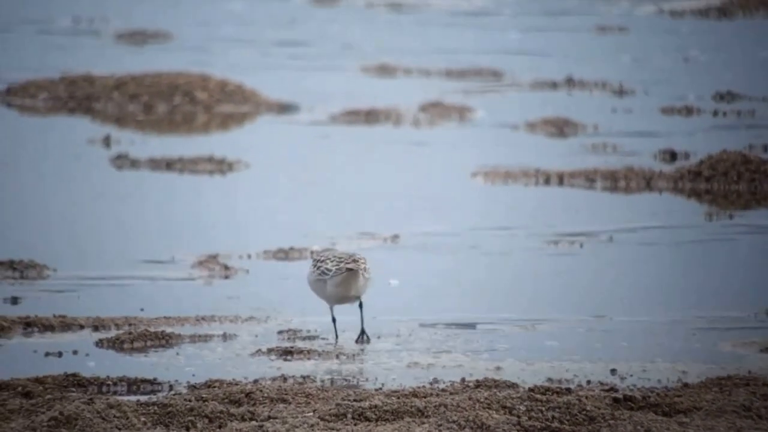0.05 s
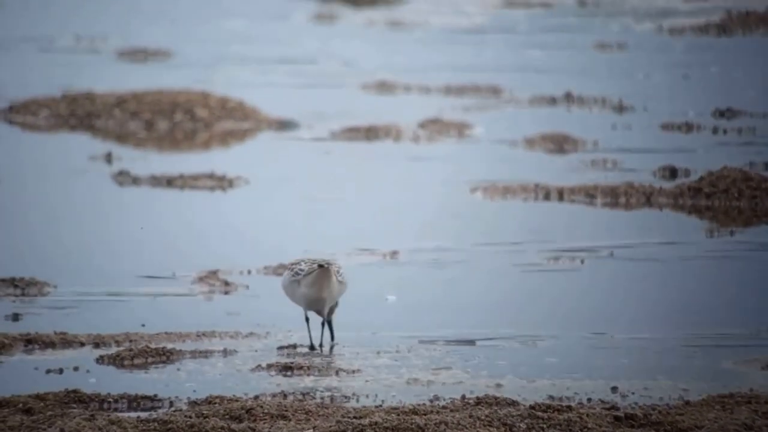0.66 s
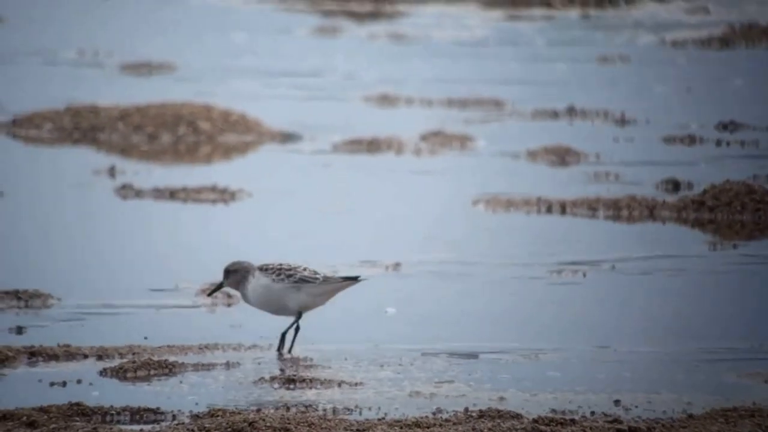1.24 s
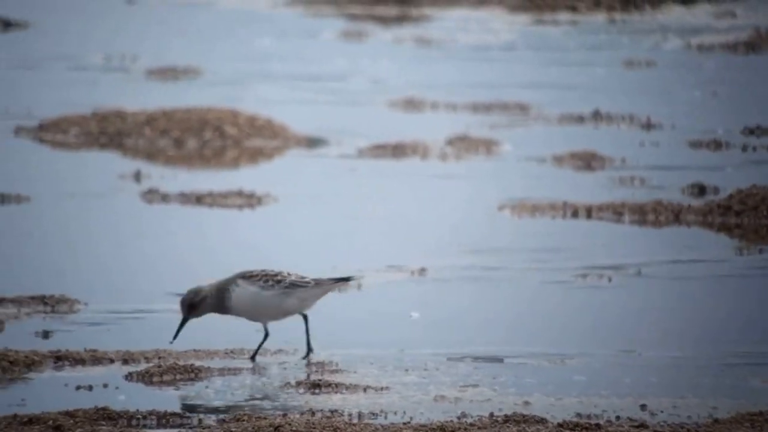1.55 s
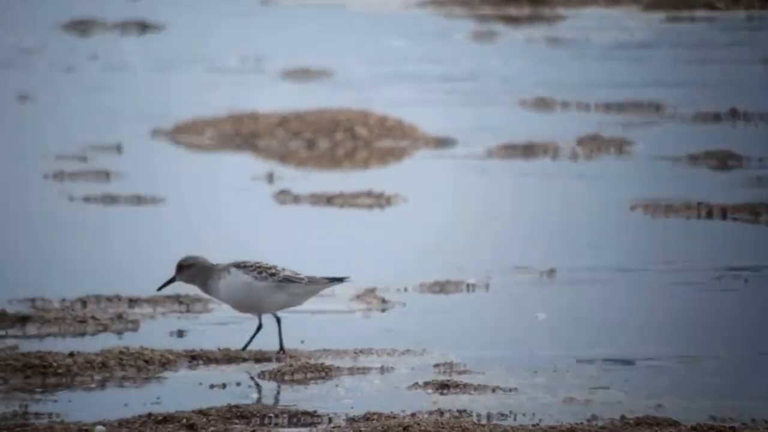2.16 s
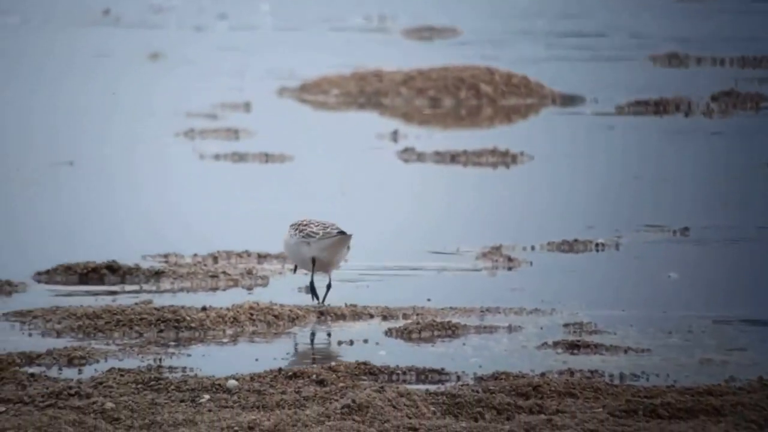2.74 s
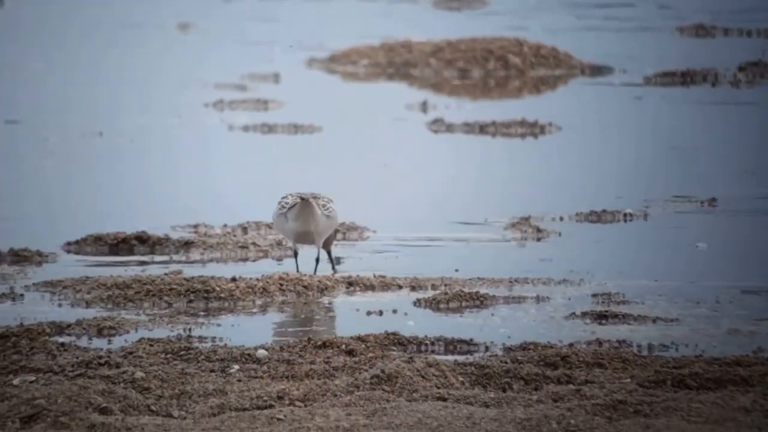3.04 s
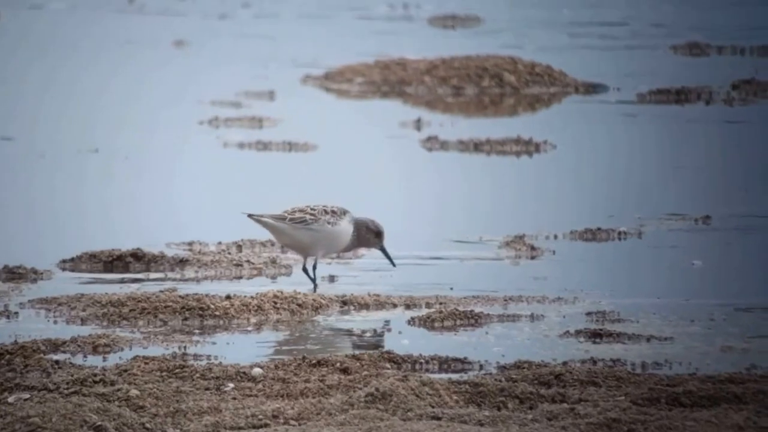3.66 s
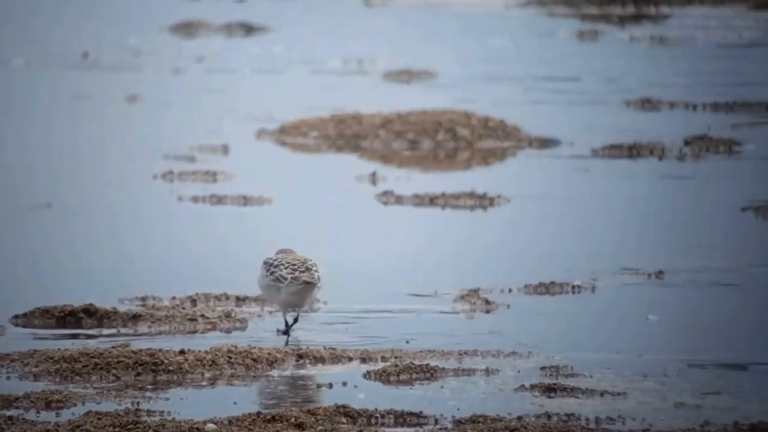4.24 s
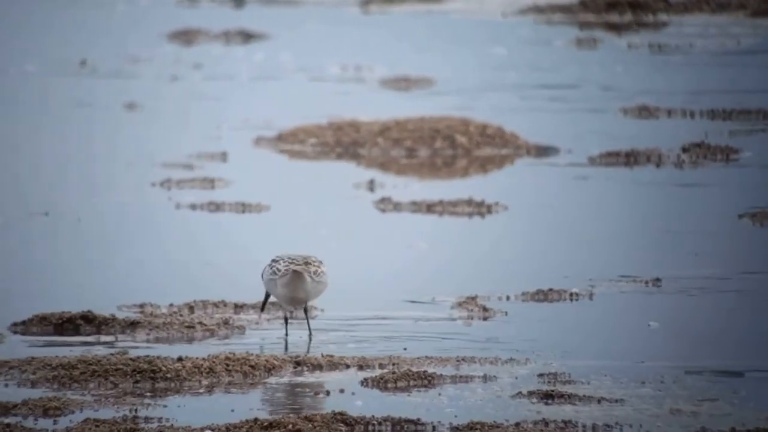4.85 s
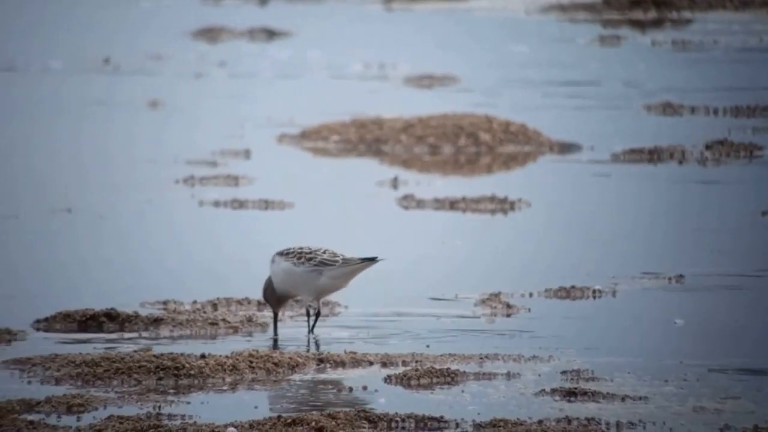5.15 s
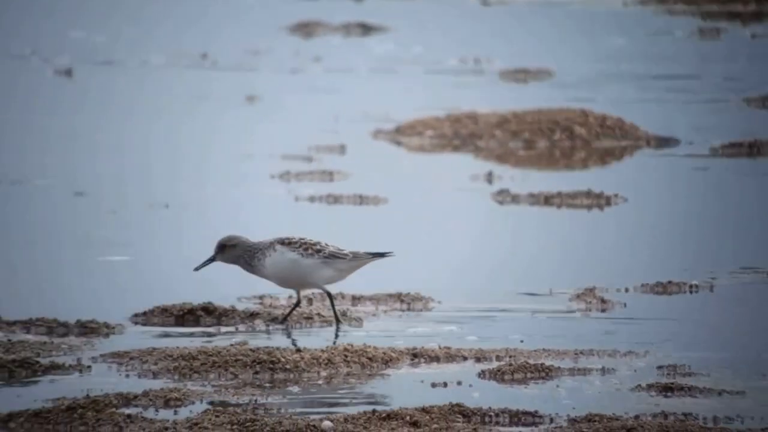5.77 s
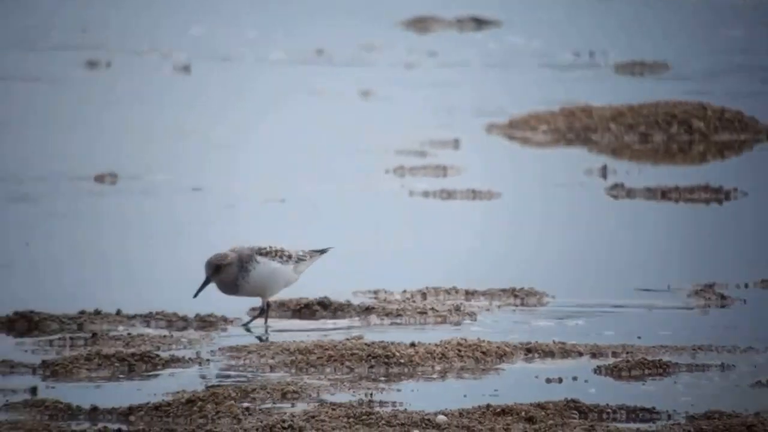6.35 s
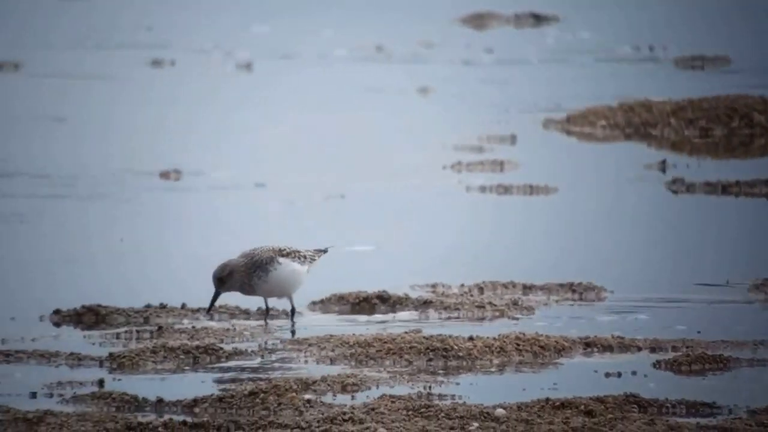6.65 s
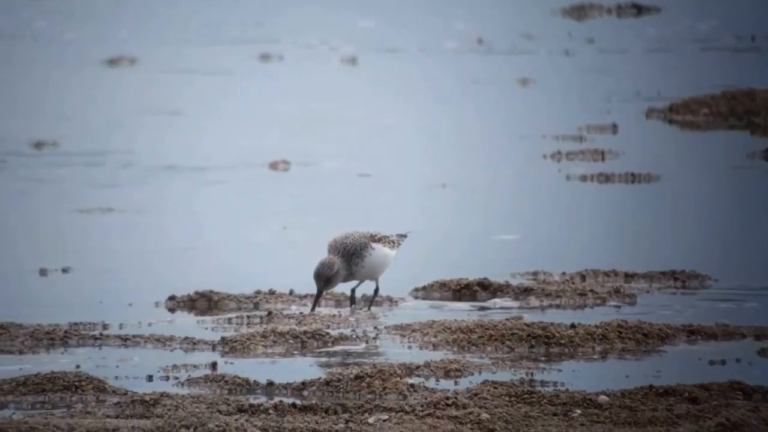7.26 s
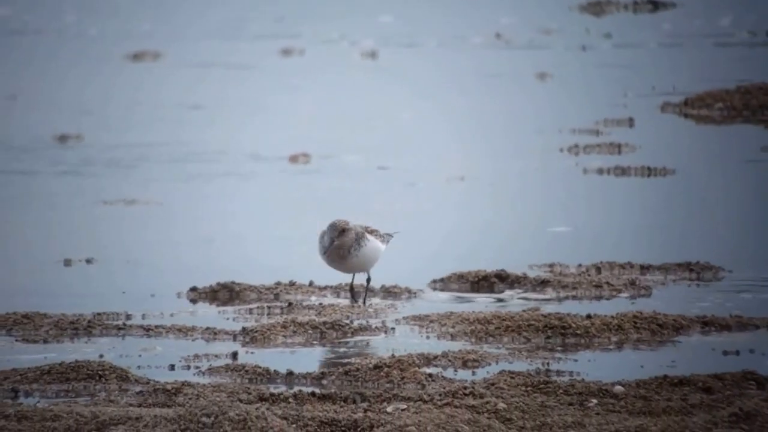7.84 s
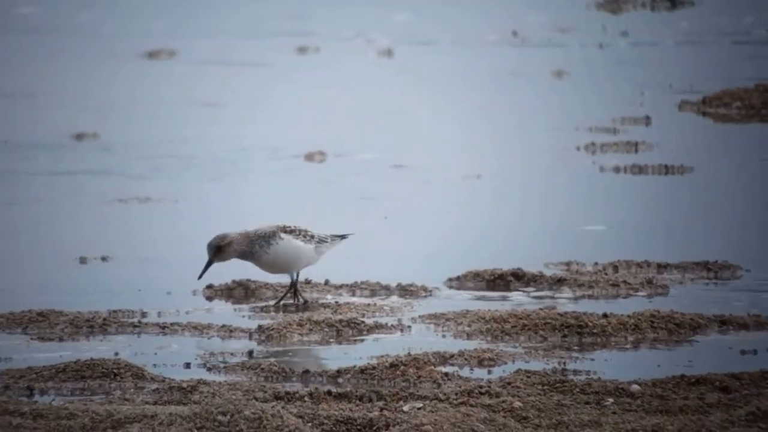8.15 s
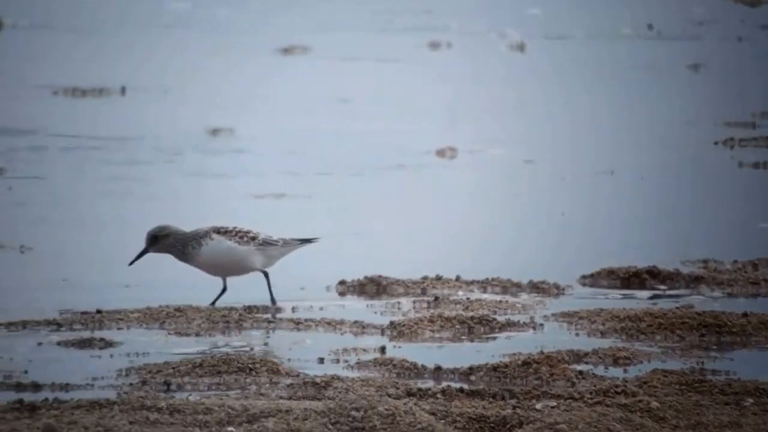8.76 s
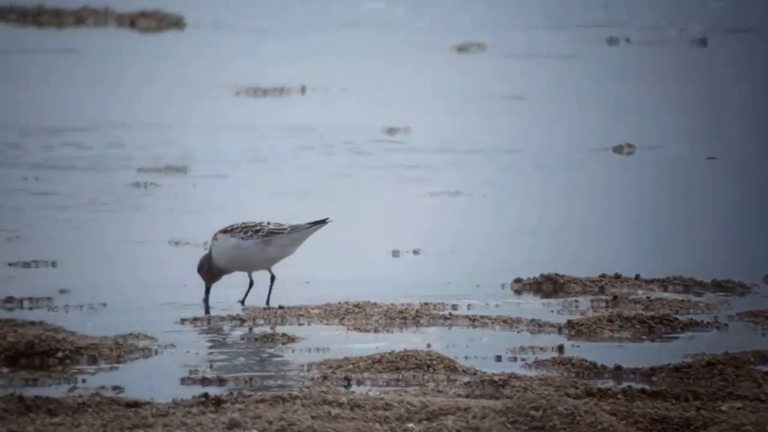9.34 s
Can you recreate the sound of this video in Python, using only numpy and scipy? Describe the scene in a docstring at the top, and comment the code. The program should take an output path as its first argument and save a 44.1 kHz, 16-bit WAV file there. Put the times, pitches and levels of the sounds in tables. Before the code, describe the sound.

Wind rumbles on the microphone in short, uneven gusts over an open tidal flat and is the loudest sound. It thumps lightly in the first two seconds, buffets hardest from 2.7 to 3.8 seconds, and returns around 5.3, 6.3 and 7.9 seconds. Small shorebirds call faintly with a slight echo. Sharp, high chips come irregularly, about once or twice a second, from 0.8 to 9 seconds. Plaintive rising whistles sound near 2.8, 5, 6.1, 7.5 and 8.9 seconds. Raspy twitters appear around 3.6 and 5.3 seconds, with a very thin, high falling call near 4 seconds and tiny pips between 4.7 and 6. Two small dry ticks come at about 0.2 seconds and another at 8.5. A soft hiss swells and fades around 1.5 seconds. Underneath lie a quiet hush, more distant birds, faint water, a low drone and a barely audible high whine.

```python
"""Shorebirds on a windy tidal flat

Small birds call with their voice box: sharp rising chips, sad whistles and a raspy twitter, each a
sliding tone smeared by echoes from the shore. Gusts of swirling air rumble and thump on the microphone.
Behind them are a few close ticks, distant water, a soft hiss, a faint low drone and a thin high whine."""
import sys
import numpy as np
from scipy import signal
from scipy.fft import rfft, irfft
from scipy.io import wavfile
from scipy.ndimage import uniform_filter1d, map_coordinates

SR = 44100
rng = np.random.default_rng(int(sys.argv[2]) if len(sys.argv) > 2 else 0)


def to_wav(s):
    """Save 16-bit WAV."""
    ch = np.atleast_2d(s).T  # columns
    pcm = np.round(np.clip(ch, -1, 1) * 32767)  # PCM
    wavfile.write(sys.argv[1], SR, pcm.astype(np.int16))


N = 414540
TIME = np.arange(N) / SR


# one chip rises, flicks up and snaps down: (time from the flick [s], pitch [ratio], level [dB])
CHIP_SHAPE = [(-.05, .92, -28), (-.035, .96, -11), (-.025, .998, -2.5), (-.015, 1.03, -.8),
              (-.005, 1.058, -1.5), (-.001, 1.23, -3.5), (.001, 1.24, -4), (.003, .84, -9), (.006, .8, -30)]
# the chips: (time of the flick [s], pitch [Hz], level [dB])
CHIP_NOTES = [(0.802, 3900, -57.5), (1.577, 3990, -58.5), (1.936, 3920, -59.5), (2.939, 3970, -57),
              (3.127, 3760, -63.5), (3.968, 4110, -53.5), (4.108, 3890, -56), (4.737, 3950, -54.5),
              (5.48, 3970, -57), (6.0, 3980, -55), (6.713, 3950, -66), (7.346, 3910, -62),
              (8.194, 4060, -61.5), (8.982, 4000, -58)]
def chips(waver=0.011, overtone_db=-25, pace_spread=0.087):
    """The bird's voice box makes the same move for every chip, each at its own pitch and pace."""
    out = np.zeros(N)
    for when, hz, db in CHIP_NOTES:
        stretch = np.exp(pace_spread * rng.standard_normal())
        t = np.arange(CHIP_SHAPE[0][0] * stretch, CHIP_SHAPE[-1][0] * stretch, 1 / SR)
        ratio, shape_db = curve(CHIP_SHAPE, t / stretch)
        pitch = hz * ratio * (1 + waver * walk(328, t - t[0]))
        voice = tone(pitch) + undb(overtone_db) * tone(2 * pitch)
        add(out, when + t[0], undb(db + shape_db) * voice)
    return out


# one whistle starts softly, rises and levels off: (how far along [0-1], pitch [ratio], level [dB])
WHISTLE_SHAPE = [(0, .91, -24), (.2, .93, -11), (.39, .945, -12), (.46, .96, -1), (.8, .99, 0),
                 (.93, 1, -4), (1, 1, -22)]
# the whistles: (start [s], length [s], top pitch [Hz], level [dB])
WHISTLE_NOTES = [(2.846, .125, 3700, -58.5), (4.992, 0.16, 3670, -55.5), (6.099, 0.14, 3740, -51),
                 (6.133, 0.14, 3100, -61), (6.45, .11, 3180, -66), (7.513, 0.13, 3630, -49),
                 (8.878, .125, 3634, -52)]
def whistles(waver=0.01, flutter_db=2.6):
    """Sad, nearly pure bird notes that share one rising shape."""
    out = np.zeros(N)
    for start, length, hz, db in WHISTLE_NOTES:
        t = np.arange(0, length, 1 / SR)
        ratio, shape_db = curve(WHISTLE_SHAPE, t / length)
        pitch = hz * ratio * (1 + waver * walk(318, t))
        add(out, start, tone(pitch) * undb(db + shape_db + flutter_db * walk(55, t)))
    return out


# the raspy twitter: (start [s], length [s], first pitch [Hz], last pitch [Hz], level [dB])
RASP_NOTES = [(3.463, 0.11, 5800, 5970, -69), (3.64, 0.078, 5650, 6380, -58),
              (3.74, 0.11, 5900, 5760, -56.5), (4.437, 0.03, 4000, 3930, -66),
              (5.227, 0.029, 4590, 4970, -61), (5.273, 0.043, 5250, 4920, -62),
              (5.3, 0.067, 4350, 4330, -69), (5.36, 0.04, 5370, 4780, -59), (5.387, 0.033, 4440, 4150, -65),
              (5.434, 0.024, 5780, 4680, -60.5), (5.5, 0.08, 4270, 3630, -63.5)]
def rasps(trill_hz=170, depth=0.074, rough=0.049):
    """Bird notes that buzz because their pitch shakes quickly and unevenly."""
    out = np.zeros(N)
    for start, length, first_hz, last_hz, db in RASP_NOTES:
        t = np.arange(0, length, 1 / SR)
        shake = depth * np.sin(2 * np.pi * trill_hz * t) + rough * walk(906, t)
        pitch = np.interp(t, [0, length], [first_hz, last_hz]) * (1 + shake)
        add(out, start, tone(pitch) * swell(t / length, crest=0.34) * undb(db))
    return out


# the path of one very high call: (time [s], pitch [Hz], level [dB])
THIN_CALL_PATH = [(3.88, 8480, -74), (3.96, 8600, -67), (4.04, 8560, -78), (4.11, 8280, -66),
                  (4.19, 7900, -71), (4.28, 7480, -74), (4.36, 7520, -67)]
def thin_call(waver=.007):
    """A thin, slightly shaky call that swells and fades as it slides down."""
    out = np.zeros(N)
    t = np.arange(THIN_CALL_PATH[0][0], THIN_CALL_PATH[-1][0], 1 / SR)
    hz, db = curve(THIN_CALL_PATH, t)
    pitch = hz * (1 + waver * walk(300, t))
    add(out, t[0], tone(pitch) * undb(db))
    return out


# short falling pips: (start [s], first pitch [Hz], level [dB])
PIP_NOTES = [(4.665, 3290, -65), (4.78, 3200, -67), (5.14, 3200, -67), (5.545, 3680, -66),
             (5.615, 3340, -63.5), (5.688, 3250, -67), (5.762, 3060, -70), (6.066, 2600, -63)]
def pips(length_s=0.0234, fall=0.248):
    """Every pip drops by the same share of its pitch in the same short time."""
    notes = [(start, length_s, hz, hz * (1 - fall), db) for start, hz, db in PIP_NOTES]
    return glides(notes, waver=0.04)


# distant calls: (start [s], length [s], first pitch [Hz], last pitch [Hz], level [dB])
FAR_NOTES = [(1.24, 0.063, 3720, 3280, -69.5), (1.92, 0.061, 3020, 2970, -70),
             (1.98, 0.057, 2900, 2450, -73), (4.45, 0.11, 4070, 4310, -61.5),
             (4.51, 0.069, 3170, 2840, -64), (5.28, 0.195, 4210, 4110, -63), (6.31, .17, 3580, 3600, -66.5),
             (6.76, 0.065, 2400, 2330, -71), (7.13, 0.23, 2140, 2100, -80), (7.75, 0.084, 970, 930, -74),
             (8.9, 0.18, 1530, 1476, -77), (8.98, 0.24, 775, 730, -72.5), (9.27, .1, 2390, 2420, -74)]
def far_calls():
    """Birds far across the flat sing faint sliding notes."""
    return glides(FAR_NOTES, waver=.015)


def glides(notes, waver, flutter_db=3.0, bend=0.41):
    """Wavering notes whose pitch slides quickly at first, then more slowly."""
    out = np.zeros(N)
    for start, length, first_hz, last_hz, db in notes:
        t = np.arange(0, length, 1 / SR)
        progress = t / length
        slide = progress + bend * progress * (1 - progress)
        pitch = (first_hz + (last_hz - first_hz) * slide) * (1 + waver * walk(320, t))
        loudness = swell(progress, crest=0.39) * undb(db + flutter_db * walk(52, t))
        add(out, start, tone(pitch) * loudness)
    return out


def shore_echoes(calls, echo_db, near_s, far_s, far_db, bank_db, bank_s=0.013):
    """A nearby bank sends back one echo, rocks and weed a quick blur, the far shore a faint long one."""
    t = np.arange(SR // 2) / SR
    near = undb(-60 * t / near_s)  # near_s and far_s: time to fade by 60 dB
    far = undb(far_db - 60 * t / far_s)
    tail = rng.standard_normal(len(t)) * (near + far) * np.minimum(t / bank_s, 1)
    tail /= np.linalg.norm(tail)
    tail[int(bank_s * SR)] += undb(bank_db)
    return calls + undb(echo_db) * signal.fftconvolve(calls, tail)[:N]


# gusts on the microphone: (start [s], length [s], level [dB])
WIND_GUSTS = [(.04, 0.18, -38.5), (0.511, .05, -48), (0.777, 0.13, -40), (1.561, 0.21, -41.5),
              (2.155, 0.37, -51.5), (2.432, 0.024, -38), (2.556, .14, -37.5), (2.7, 0.1, -27.5),
              (2.83, .2, -34), (3.205, 0.12, -36.5), (3.448, 0.1, -32.5), (3.595, 0.032, -29.5),
              (3.687, 0.099, -32.5), (3.901, 0.27, -36.5), (4.262, 0.039, -28), (4.686, 0.048, -36),
              (5.035, 0.026, -38.5), (5.222, 0.11, -28.5), (6.01, .33, -41.5), (6.4, 0.24, -53.5),
              (7.065, 0.096, -40), (7.492, 0.016, -44.5), (7.882, 0.085, -38), (8.023, 0.025, -37.5),
              (8.105, 0.094, -42), (8.361, 0.057, -38.5), (8.8, 0.72, -56.5)]
def gusts(rise_s=0.031, fade_s=0.026, breeze_db=-61.5, buffet_per_s=25, buffet_db=2.5):
    """How hard the wind blows: each gust builds, holds unevenly and dies away over a light breeze."""
    power = np.full(N, undb(breeze_db) ** 2)
    t = np.arange(SR) / SR - rise_s
    for start, length, db in WIND_GUSTS:
        rise = np.minimum(1 + t / rise_s, 1)
        fade = np.exp(-np.maximum(t - length, 0) / fade_s)
        add(power, start + t[0], (undb(db) * rise * fade) ** 2)
    return np.sqrt(power) * undb(buffet_db * walk(buffet_per_s))


# how deep the wind's rumble sounds: (frequency [Hz], level [dB])
RUMBLE_COLOUR = [(20, -31), (35, -5), (50, 3), (65, 5), (100, -5.5), (140, -8.5), (200, -26.5),
                 (300, -38.5), (500, -73), (1000, -88)]
def wind(rumble_db=-3.0, flutter_db=-23, rustle_db=-39, rustle_growth=0.41, strong_db=-30):
    """Churning air rumbles in the microphone's opening; strong gusts also flutter and faintly rustle."""
    strength = gusts()
    force = strength / undb(strong_db)  # 1 in a strong gust
    rumble = noise(RUMBLE_COLOUR)
    rumble /= np.sqrt(uniform_filter1d(rumble ** 2, SR // 16))  # even it out: gusts alone set the swells
    flutter = noise([(100, -2), (200, 7), (300, -3), (450, -22.5), (900, -61.5)])
    flutter *= undb(flutter_db) * force
    rustle = noise([(300, -10), (1500, -31), (5000, 32), (15000, 24)])
    rustle *= undb(strong_db + rustle_db) * force ** rustle_growth
    return strength * (undb(rumble_db) * rumble + flutter) + rustle


# strong swirls of air that hit the microphone: (time [s], pitch [Hz], level [dB])
SWIRLS = [(0.311, 103, -30.5), (.845, 73, -27), (1.598, 76, -31), (1.74, 89, -32), (2.701, 127, -25),
          (2.872, 132, -20.5), (2.957, 81.5, -24.5), (3.094, 131, -21), (3.21, 94, -19), (3.259, 111, -27),
          (3.421, 73, -20.5), (3.486, 91.5, -23), (3.734, 72, -22.5), (4.289, 100, -32),
          (5.216, 112, -30.5), (5.265, 93, -23), (5.323, 135, -25), (6.248, 125, -33), (6.271, 79, -26.5),
          (6.339, 69.4, -27), (7.896, 87, -28.5)]
# the noise of a swirl's ragged edge: (frequency [Hz], level [dB])
RAGGED_COLOUR = [(60, -3.5), (140, 6), (260, 6), (400, -7.5), (600, -23.5), (1200, -79)]
def swirls(ring_hz=62, ring_s=0.03, ring_db=-9, sharpness=2.37, rough_db=-19, rough_s=0.0075):
    """Each swirl thumps with one push and pull of air; the microphone's opening rings briefly after it."""
    thumps, ragged = np.zeros(N), np.zeros(N)
    t = np.arange(-SR // 25, SR // 10) / SR
    after = np.maximum(t, 0)
    ring = undb(ring_db) * np.sin(2 * np.pi * ring_hz * after) * np.exp(-after / ring_s)
    burst = np.exp(-(t / rough_s) ** 2)
    for when, hz, db in SWIRLS:
        passage = 2 * sharpness * hz * t
        push_pull = -passage * np.exp((1 - passage ** 2) / 2)
        add(thumps, when + t[0], rng.choice([-1, 1]) * undb(db) * (push_pull - ring))
        breakup = (hz / 110) ** 2  # small fast swirls break up more
        add(ragged, when + t[0], undb(db + rough_db) * breakup * burst)
    return thumps + ragged * noise(RAGGED_COLOUR)


def microphone_opening(pressure, cut_hz=45.3):
    """The microphone's opening lets no deep bass through."""
    return signal.sosfilt(signal.butter(4, cut_hz, "high", fs=SR, output="sos"), pressure)


# small ticks close by: (time [s], level [dB])
CLOSE_TICKS = [(0.178, -50), (0.218, -52.5), (8.535, -51)]
# a tick's mix of low and high sound: (frequency [Hz], level [dB])
TICK_COLOUR = [(300, 20), (900, 4.5), (1800, 6.5), (2450, 12.5), (3300, -12), (6500, -0.5), (12000, -27)]
def ticks(fade_s=0.054):
    """Dry little cracks: bursts of noise that die away at once."""
    loudness = np.zeros(N)
    t = np.arange(SR // 20) / SR
    for when, db in CLOSE_TICKS:
        add(loudness, when, undb(db - 60 * t / fade_s))
    return loudness * noise(TICK_COLOUR)


# the hush of the open shore: (frequency [Hz], level [dB])
AIR_COLOUR = [(15, -85), (25, -37), (55, 2.5), (75, -7), (169, -18.5), (221, -19), (305, -25.5),
              (421, -23.5), (495, -26), (684, -27.5), (804, -30), (4040, -39.5), (6380, -35.5),
              (9050, -44.5), (15500, -45)]
def open_air(level_db=-64.5, ripple_db=0.13):
    """Open air makes a nearly steady noise, strongest in the bass."""
    air = noise(AIR_COLOUR)
    above_bass = signal.sosfilt(signal.butter(8, 300, "high", fs=SR, output="sos"), air)
    air /= np.std(above_bass)  # so level_db is the level of the part above the bass
    return air * undb(level_db + ripple_db * walk(5))


# the wash of distant water: (time [s], middle frequency [Hz], level [dB])
WASH_PATH = [(0, 1010, -92.5), (1.8, 1190, -73), (3, 900, -84), (4, 630, -78), (5, 620, -71.5),
             (5.7, 760, -77.5), (6.6, 674, -72), (8, 652, -78), (9.4, 685, -75)]
def distant_water(lap_db=1.4, width_octaves=0.54):
    """Far water washes and laps: a band of noise that slowly drifts higher and lower."""
    middle_hz, db = curve(WASH_PATH)
    out = np.zeros(N)
    for hz in np.geomspace(400, 1600, 5):
        band = noise([(hz / 2, -40), (hz, 0), (hz * 2, -40), (SR / 2, -90)])
        closeness = np.exp(-(np.log2(hz / middle_hz) / width_octaves) ** 2)
        out += band * closeness * undb(db + lap_db * walk(10))
    return out


# the rise and fall of the hiss: (time [s], level [dB])
HISS_SWELL = [(.5, -92), (.85, -75), (1.2, -65.5), (1.65, -62.5), (1.85, -73), (2.1, -104)]
# how bright the hiss sounds: (frequency [Hz], level [dB])
HISS_COLOUR = [(1500, -52), (2200, 5), (2700, -11), (4000, -2), (4800, 2.5), (6500, 4.5), (8000, -6),
               (14000, -19)]
def hiss():
    """A soft hiss swells once and fades."""
    return noise(HISS_COLOUR) * undb(curve(HISS_SWELL)[0])


# the path of the low drone: (time [s], pitch [Hz], level [dB])
DRONE_PATH = [(0, 77, -68), (1.3, 86.2, -58.5), (2.2, 77.9, -62), (5.7, 65.6, -68), (6.8, 68.43, -56.5),
              (8.6, 69.12, -59), (9.4, 70.14, -53)]
def drone(waver=0.0302, throb_db=2, rumble_db=-13):
    """A low tone wavers and throbs, with a soft rumble just above it."""
    hz, db = curve(DRONE_PATH)
    throb = undb(throb_db * walk(12))
    rumble = noise([(80, -43), (210, 3.5), (320, -0.5), (700, -27.5), (2000, -64)])
    pitch = hz * (1 + waver * walk(8.3))
    return undb(db) * (throb * tone(pitch) + undb(rumble_db) * rumble)


# the tones of the whine: (pitch [Hz], level [dB])
WHINE_TONES = [(6184, -87), (7563, -89), (7623, -85), (7925, -85), (7985, -97.5)]
def whine(waver_hz=3):
    """A few thin, high tones hold almost still."""
    return sum(tone(hz + waver_hz * walk(20)) * undb(db) for hz, db in WHINE_TONES)


def undb(db):
    """Turn decibels into a number to multiply a sound by."""
    return 10 ** (np.asarray(db) / 20)


def curve(rows, at=TIME):
    """Join a table's rows with straight lines: one curve for each column after the first."""
    times, *columns = np.transpose(rows)
    return [np.interp(at, times, column) for column in columns]


def add(out, start, sound):
    """Mix a sound in at a start time in seconds."""
    i = max(int(start * SR), 0)
    out[i:i + len(sound)] += sound[:len(out) - i]


def noise(colour):
    """Noise of average power 1, shaped by a colour: rows of (frequency [Hz], level [dB])."""
    hz, db = np.transpose(colour)
    frequencies = np.maximum(np.fft.rfftfreq(N, 1 / SR), 1)
    gain = undb(np.interp(np.log(frequencies), np.log(hz), db))
    shaped = irfft(rfft(rng.standard_normal(N)) * gain, N)
    return shaped / np.sqrt(np.mean(shaped ** 2))


def walk(per_s, t=TIME):
    """A smooth random wobble, about 1 in size, through per_s new values a second."""
    points = rng.standard_normal(4096)
    return map_coordinates(points, [t * per_s], order=2, mode="wrap")


def tone(hz):
    """A pure tone that follows a changing pitch."""
    return np.sqrt(2) * np.sin(2 * np.pi * np.cumsum(hz) / SR)


def swell(progress, crest):
    """A note's loudness from start (0) to end (1): up to the crest, then down."""
    return np.sin(np.pi * np.interp(progress, [0, crest, 1], [0, .5, 1]))


def scene():
    """Echoing birds out on the flat, wind at the microphone and a quiet background, in one channel."""
    birds = shore_echoes(chips(), echo_db=4, near_s=.22, far_s=.5, far_db=-18, bank_db=-7)
    clear_calls = whistles() + thin_call()
    birds += shore_echoes(clear_calls, echo_db=-7.5, near_s=.16, far_s=.5, far_db=-18, bank_db=-18)
    faint_calls = far_calls() + pips()
    birds += shore_echoes(faint_calls, echo_db=-4, near_s=.17, far_s=.6, far_db=-13, bank_db=-12)
    birds += shore_echoes(rasps(), echo_db=-2, near_s=.12, far_s=.5, far_db=-15, bank_db=-6)
    weather = microphone_opening(wind() + swirls())
    background = ticks() + open_air() + distant_water() + hiss() + drone() + whine()
    return (birds + weather + background)[None]


def record(dry):
    """Cut away the very highest treble."""
    top_hz = 15750
    return signal.sosfilt(signal.ellip(10, .1, 70, top_hz, fs=SR, output="sos"), dry)


dry = scene()
out = record(dry)
to_wav(out)
```